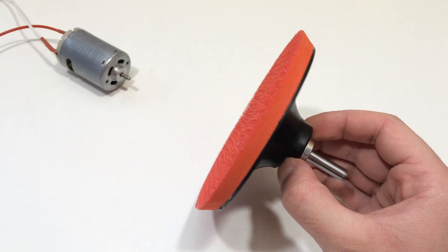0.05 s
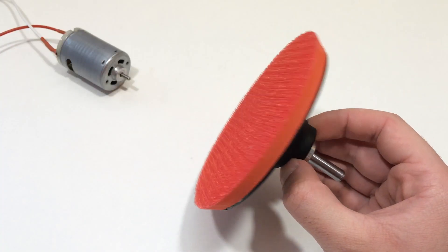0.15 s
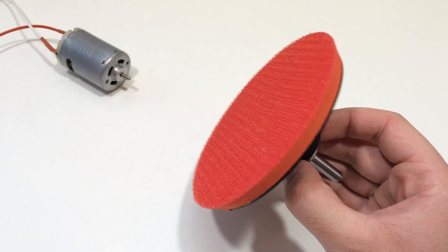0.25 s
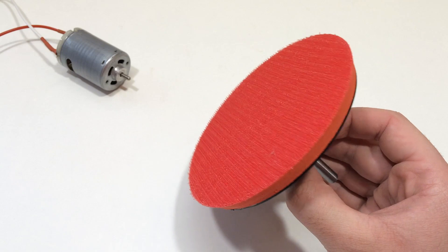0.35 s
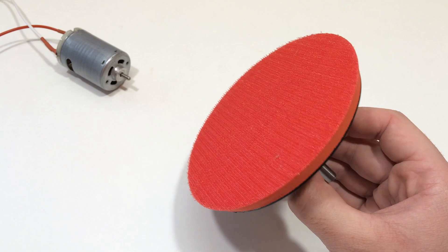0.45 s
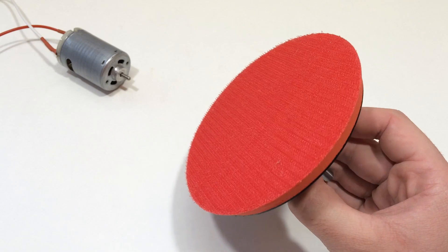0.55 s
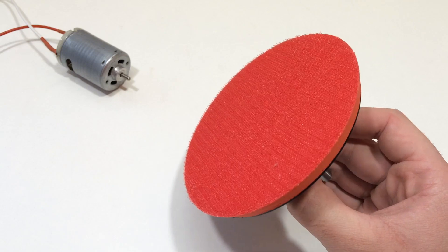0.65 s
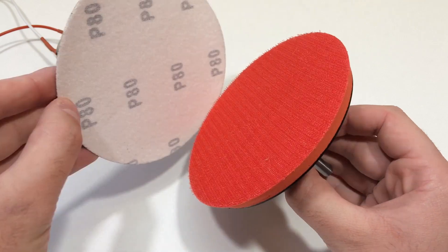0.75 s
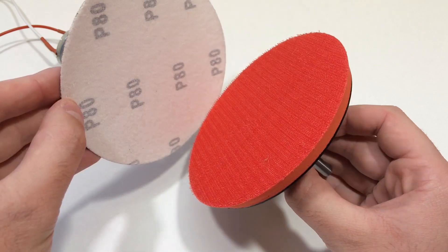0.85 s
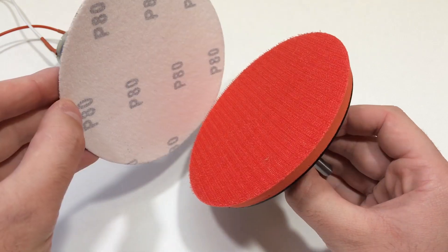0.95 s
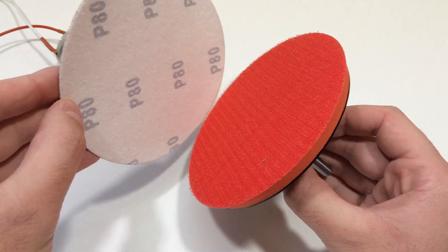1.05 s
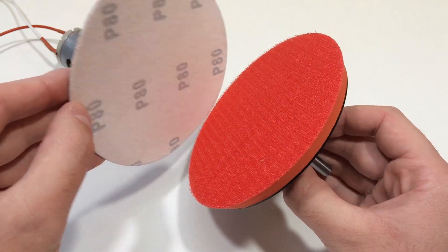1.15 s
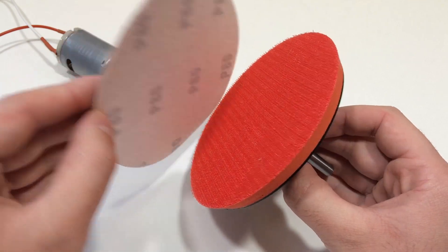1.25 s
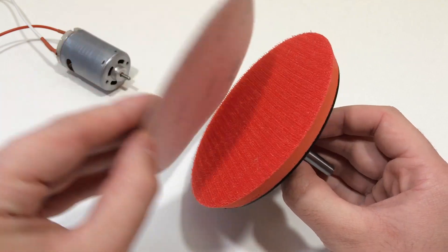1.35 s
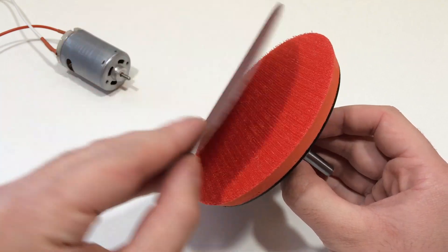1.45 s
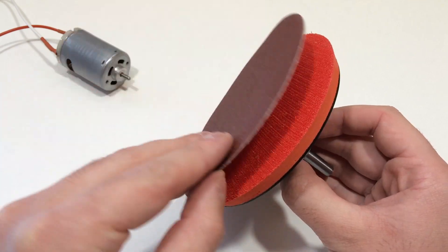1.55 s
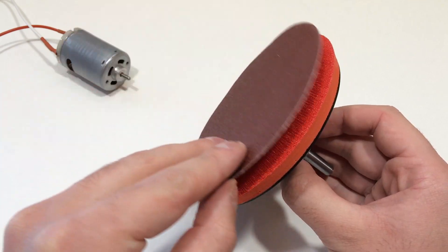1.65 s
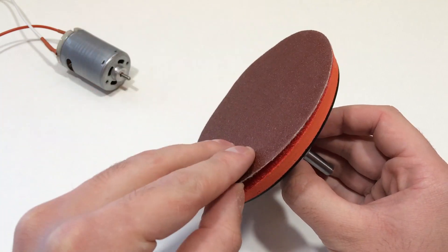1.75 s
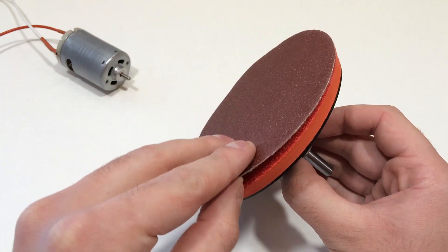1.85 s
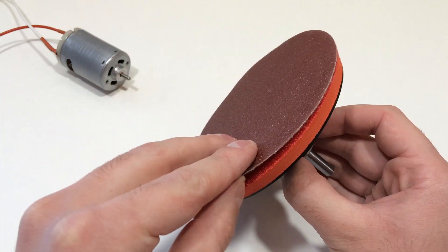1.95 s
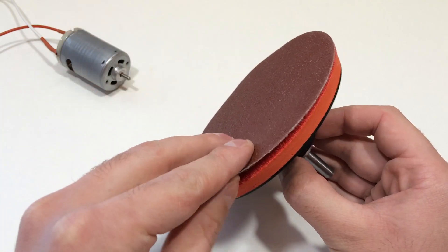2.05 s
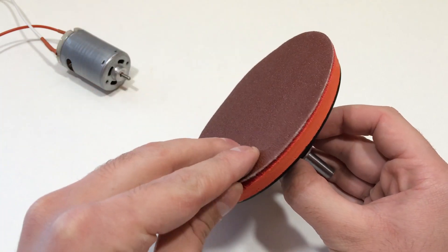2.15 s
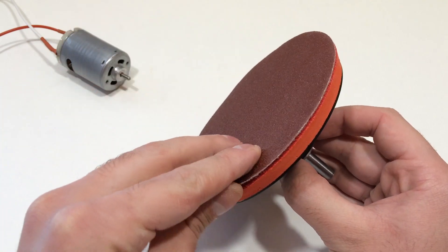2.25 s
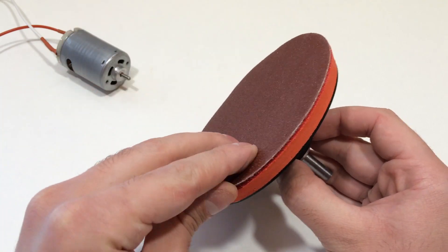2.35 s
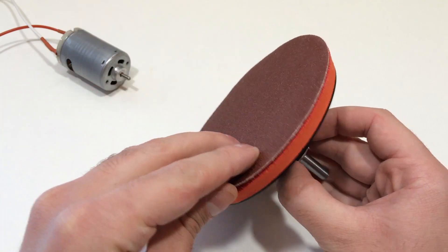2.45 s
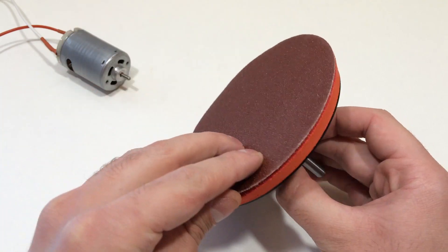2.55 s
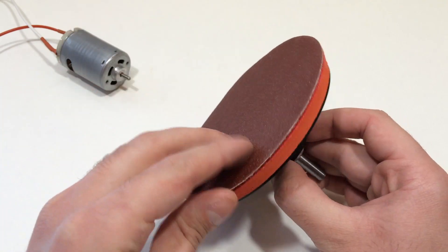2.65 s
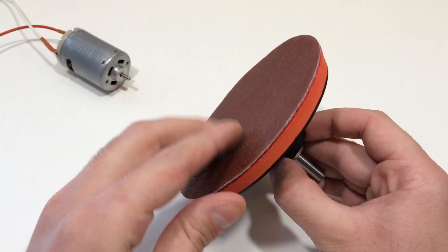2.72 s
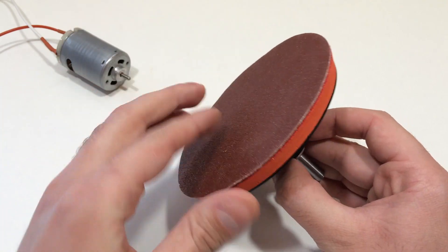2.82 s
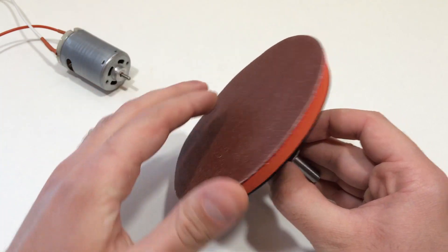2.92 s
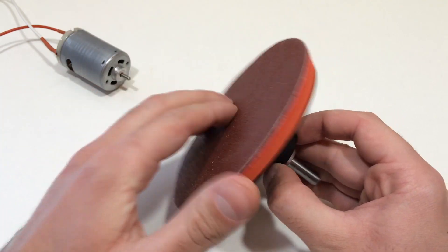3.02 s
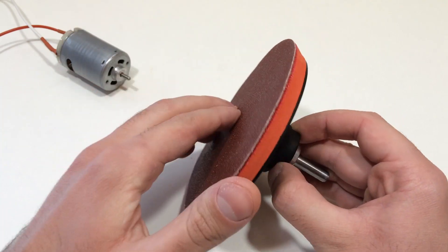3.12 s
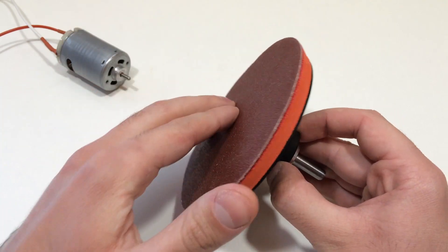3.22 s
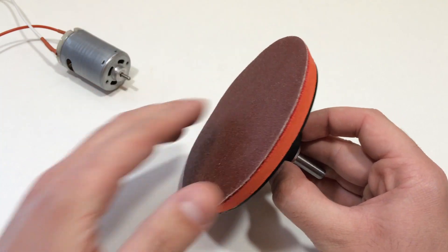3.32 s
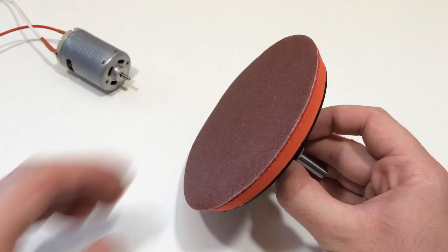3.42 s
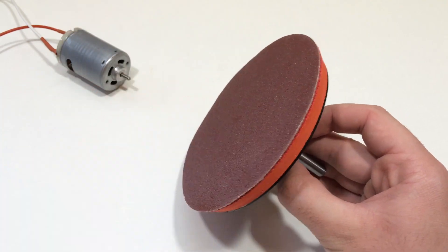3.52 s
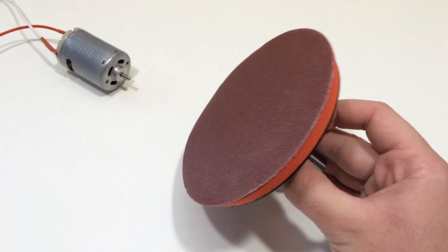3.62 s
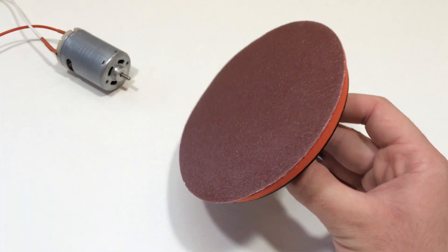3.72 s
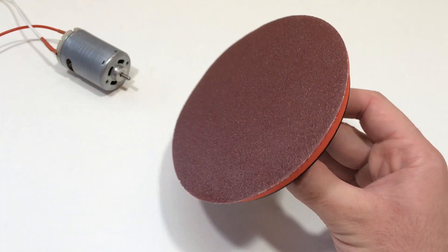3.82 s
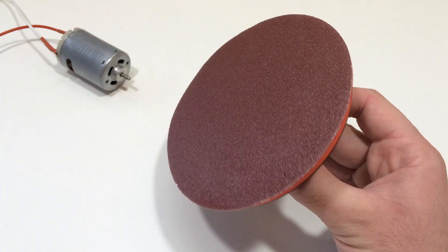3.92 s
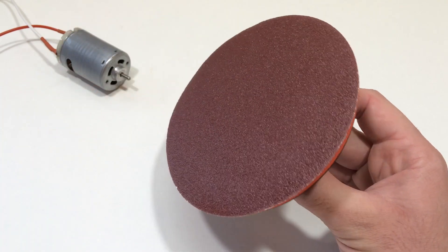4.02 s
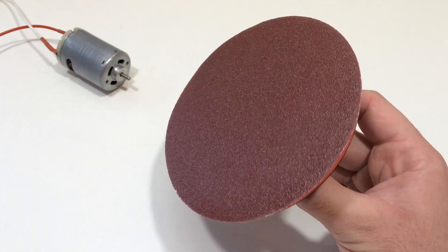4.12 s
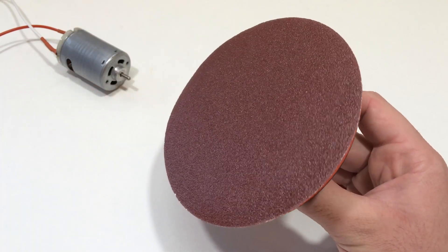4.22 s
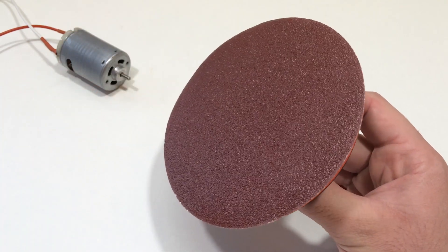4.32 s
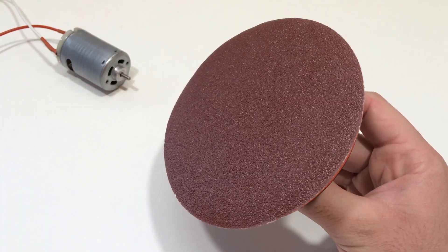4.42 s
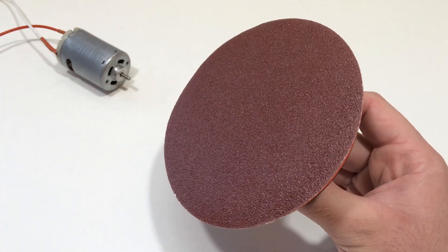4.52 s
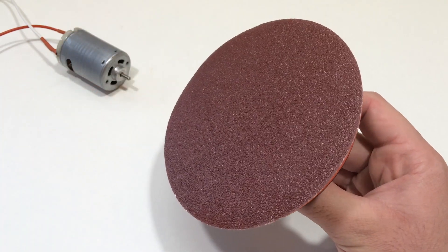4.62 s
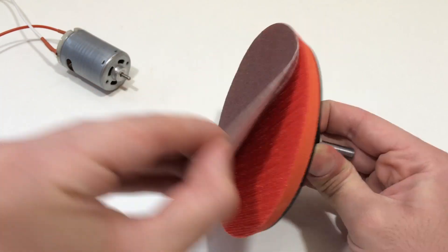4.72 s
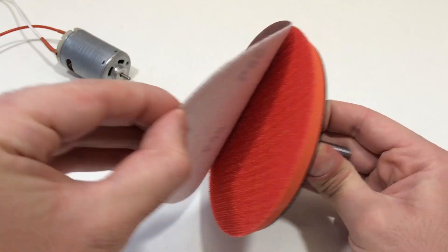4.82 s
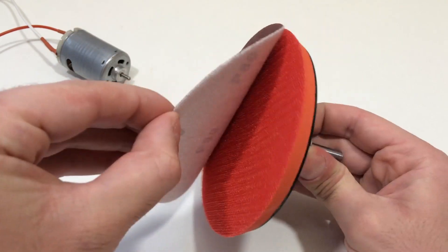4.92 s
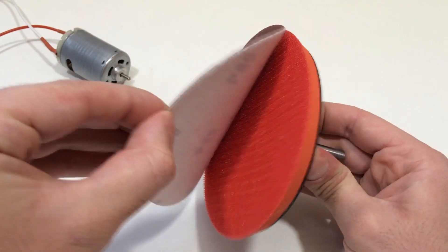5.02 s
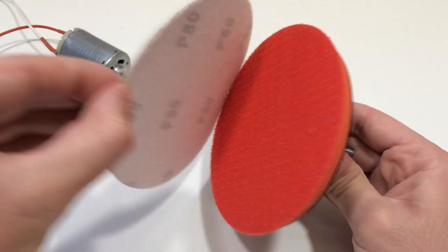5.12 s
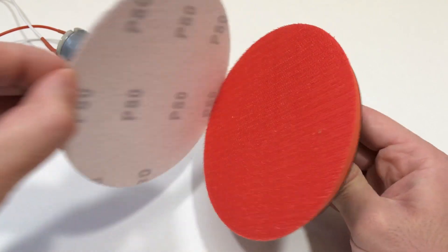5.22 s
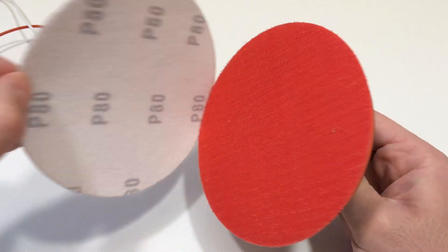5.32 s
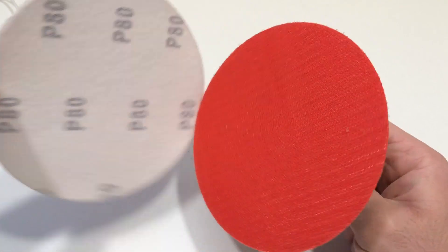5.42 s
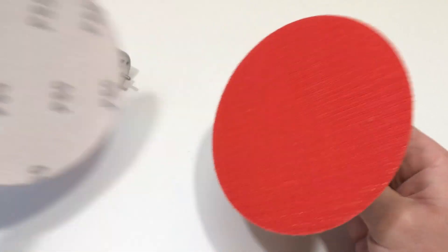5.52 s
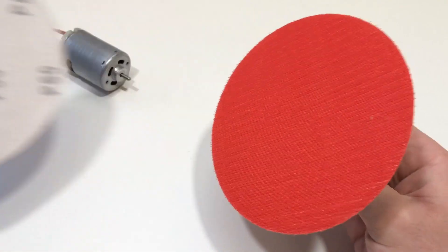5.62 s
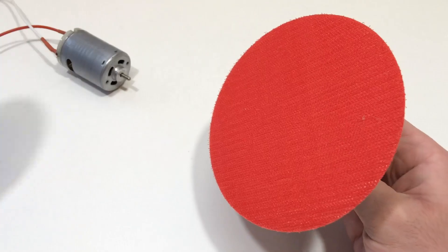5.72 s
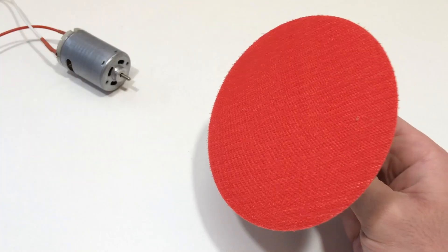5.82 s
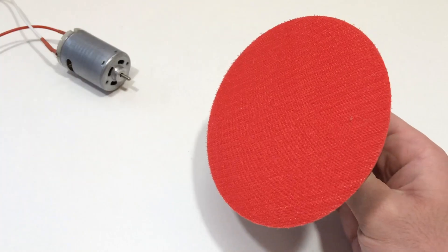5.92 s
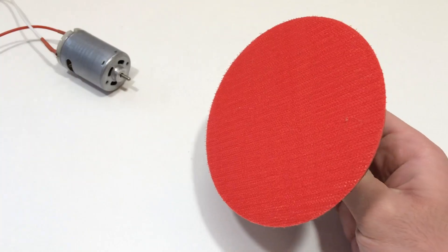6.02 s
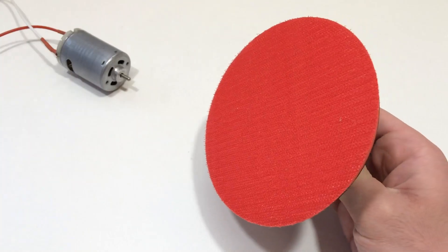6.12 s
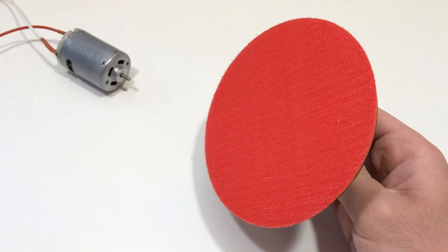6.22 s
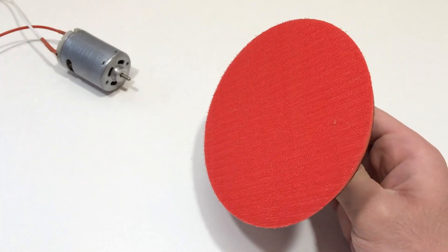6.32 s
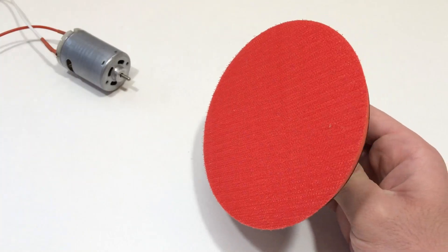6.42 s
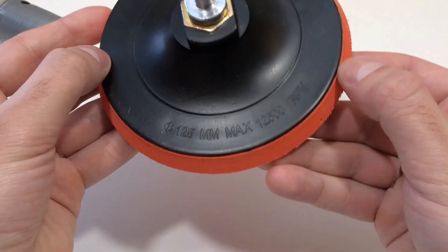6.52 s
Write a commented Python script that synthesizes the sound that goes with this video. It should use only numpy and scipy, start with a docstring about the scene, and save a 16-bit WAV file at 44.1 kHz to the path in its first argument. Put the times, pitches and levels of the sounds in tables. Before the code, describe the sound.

A fabric-backed sanding disc is lightly handled, then torn sharply from a hook-and-loop pad, two harsh bursts and a trailing crackle, close and dry.

```python
"""Steady hiss comes first, then a lumpy low rumble with light ticks and scrapes of handling.
A sanding disc is pressed on to a hand-held hook-and-loop pad, then ripped off in a few quick, uneven pulls.
The hooks let go in clusters of tiny snaps, filtered noise bursts that ring the paper and tug the pad.
Weak loops crackle, the paper drums, and the freed flap flops once, as a few fading sine waves.
Short echoes and a noise tail place all this close above a table in a small room."""
import sys
import numpy as np
from scipy import signal
from scipy.fft import rfft, irfft
from scipy.io import wavfile
from scipy.ndimage import uniform_filter1d

SR = 44100
rng = np.random.default_rng(int(sys.argv[2]) if len(sys.argv) > 2 else 0)


def to_wav(sig):
    """Store sig (one row per channel, or 1-D mono) as 16-bit WAV at the path in sys.argv[1].

    Samples outside -1..1 are clipped; the rate is SR.
    """
    pcm = np.clip(np.atleast_2d(sig), -1, 1) * 32767
    pcm = np.round(pcm).astype(np.int16)
    wavfile.write(sys.argv[1], SR, pcm.T)  # frames by channels


N = 289456
TIME = np.arange(N) / SR
SIZE = 2048  # samples in one snap
BINS = np.fft.rfftfreq(SIZE, 1 / SR)
SIDES = np.array([[1], [-1]])  # opposite signs in the left and right channels

# the paper's main resonance and tone as it bends and comes free; snap() scales the brightness:
# start_s [s], pitch_hz [Hz], lift_db [dB], brightness [dB before scaling]
FLAP_CURVE = [(1.4, 1620, 2, 0), (4.7, 1750, 2.5, 7.5), (4.81, 1690, 3, 1.5), (4.87, 2140, 8, -0.5),
              (5.07, 1740, 7, -2), (5.2, 1800, 5, 1.5), (5.28, 1830, 7.5, 8.5), (5.4, 1510, 6, -2),
              (5.55, 1340, 15, 6.5)]
# tone of one hook's snap: pitch_hz [Hz], relative level_db [dB]
SNAP_TONE = [(40, -38), (250, -23.5), (800, -9.5), (1200, -6), (1700, 0.5), (2400, -1.5), (3200, 2),
             (4200, 0), (6000, 3.5), (7500, 0), (10000, -5.5), (13000, -9), (16000, -21)]
# tone of the foam pad when a hook tugs it: pitch_hz [Hz], relative level_db [dB]
PAD_TONE = [(30, -28), (80, -5), (200, -1), (330, 1), (430, -7.5), (550, 1.5), (800, -8.5), (1500, -17),
            (4000, -82)]
# stretches in which the peeling line advances, and the pitch that the flap's drumming sinks towards:
# start_s [s], length_s [s], crackle level_db [dB], low_hz [Hz]
PULL_TIMES = [(4.689, 0.056, -49, 303), (4.769, 0.124, -31.5, 185.6), (5.125, 0.093, -32, 315.3),
              (5.262, 0.048, -37.5, 294.5), (5.353, .011, -33, 320), (5.51, 0.038, -32, 300)]


def gain_of(db):
    """Turns decibels into amplitude."""
    return 10 ** (np.asarray(db) / 20)


def evened(x):
    """Scales a sound to rms 1."""
    return x / np.sqrt(np.mean(x ** 2) + 1e-20)


def read(points, hz):
    """Reads a table between its points, along a log-frequency axis."""
    f, value = np.transpose(points)
    return np.interp(np.log(hz + 1), np.log(f + 1), value)


def follow(curve, s, axis=1):
    """Reads one column of a curve at the times s."""
    columns = np.transpose(curve)
    return np.interp(s, columns[0], columns[axis])


def add(mix, s, sound):
    """Mixes a sound in at time s."""
    part = mix[round(s * SR):][:len(sound)]
    part += sound[:len(part)]


def ring(db):
    """Makes the sharp-fronted (minimum-phase) response that has this spectrum, with energy 1."""
    log_gain = np.log(gain_of(np.r_[db, db[-2:0:-1]]))
    response = np.fft.ifft(np.exp(np.conj(signal.hilbert(log_gain)))).real
    return response / np.linalg.norm(response)


def noise(spectrum):
    """Makes steady noise of rms 1 with this spectrum."""
    colour = gain_of(read(spectrum, np.fft.rfftfreq(N, 1 / SR)))
    return evened(irfft(rfft(rng.standard_normal(N)) * colour, N))


def burst(sound, db):
    """Gives a short sound the energy of 1 ms of sound with rms level db."""
    return gain_of(db) * sound * np.sqrt(SR / 1000) / np.linalg.norm(sound)


def hiss(level_db=-60.5):
    """Microphone hiss: steady random noise, separate in the two channels."""
    # tone of the hiss: pitch_hz [Hz], relative level_db [dB]
    hiss_tone = [(18, -36), (30, -2.5), (467, -3.5), (709, -3.5), (921, -2.5), (1020, -4.5), (1820, -5),
                 (15500, -7.5)]
    return gain_of(level_db) * np.array([noise(hiss_tone), noise(hiss_tone)])


def rumble_strength(from_s=0.714, to_s=5.76, level_db=-57.5, entry_db=-7, swell_s=0.64, fade_db_per_s=17):
    """Strength of the low rumble: it sets in quickly, swells, holds and dies away."""
    swell_db = entry_db * np.clip(1 - (TIME - from_s) / swell_s, 0, 1)
    fade_db = fade_db_per_s * np.maximum(TIME - to_s, 0)
    entry = np.clip((TIME - from_s) / 0.01, 0, 1)
    return gain_of(level_db + swell_db - fade_db) * entry


def rumble(lumps_db=1.5, side_db=-27):
    """Lumpy, near-mono low noise: slow random swells in strength, coloured by a few resonances."""
    # tone beneath the resonances: pitch_hz [Hz], relative level_db [dB]
    rumble_tone = [(20, -14.5), (35, -20), (58, -5.5), (80, -5), (120, -8.5), (190, -27.5), (320, -11.5),
                   (420, -20), (650, -23.5), (1000, -20.5), (1600, -29), (4000, -39), (16000, -54)]
    # resonances: pitch_hz [Hz], spread_hz to either side [Hz], relative level_db [dB]
    resonances = [(61, 14.7, 7.5), (107, 22.4, 2), (134.6, 22.4, 3), (171.7, 9.7, 5), (208.7, 8.6, 0),
                  (236, 28, -6), (292, 35, -9), (317, 20.4, -4.5)]
    hz = np.fft.rfftfreq(N, 1 / SR)
    booms = sum(gain_of(db) ** 2 / (1 + ((hz - f) / spread) ** 2) ** 3 for f, spread, db in resonances)
    colour = np.sqrt(gain_of(read(rumble_tone, hz)) ** 2 + booms)
    lumps = gain_of(lumps_db * noise([(1, 7.0), (14, -6), (40, -65), (80, -120)]))
    mid, side = (evened(irfft(rfft(lumps * rng.standard_normal(N)) * colour, N)) for _ in range(2))
    return rumble_strength() * (mid + SIDES * gain_of(side_db) * side)


def snap(spectrum, s, bright_db, flap_octaves=0.69, pivot_hz=3800, tilt_share=0.39, uneven_db=2.1,
         scatter_db=-4, scatter_t60=0.0085):
    """One snap through the paper; each spot colours it, and bending waves scatter back from the rim."""
    octave = np.log2(BINS + 1)
    octaves_off = octave - np.log2(follow(FLAP_CURVE, s))
    flap_db = follow(FLAP_CURVE, s, axis=2) * np.exp(-(octaves_off / flap_octaves) ** 2)
    tilt_db = tilt_share * bright_db * np.tanh(2 * (octave - np.log2(pivot_hz)))
    # random unevenness of tone, smoothed along the spectrum
    spot = uniform_filter1d(rng.standard_normal(len(BINS)), size=24)
    spot = evened(uniform_filter1d(spot, size=24))
    t = TIME[:SIZE]
    waves = rng.standard_normal(SIZE) * gain_of(-60 * t / scatter_t60) * (1 - np.exp(-t / 0.00025))
    paper = signal.unit_impulse(SIZE) + gain_of(scatter_db) * waves / np.linalg.norm(waves)
    direct = ring(read(spectrum, BINS) + flap_db + tilt_db + uneven_db * spot)
    return signal.fftconvolve(direct, paper)[:SIZE]


def ticks(touch_s=1.7, press_from_s=1.9, press_to_s=2.31, count=14):
    """Bare paper ticks, then single hooks catch as the disc is fitted and pressed home."""
    # the clearest ticks; snap() scales the brightness:
    # start_s [s], level_db [dB, rms over 1 ms], brightness [dB before scaling]
    clear_ticks = [(1.0542, -50, -3), (1.0752, -47, 2), (1.2655, -38.5, -5.5), (1.3354, -47.5, -5),
                   (1.4348, -24, 2), (1.4413, -38, -11), (1.4952, -48, -3), (1.5382, -36.5, -6),
                   (1.5486, -44, -7), (1.655, -52, -8), (1.7366, -36.5, 8.5), (1.7456, -42, 7),
                   (2.0558, -49, 3), (2.1605, -45.5, 0), (2.3609, -40, 13), (2.378, -45.5, 16),
                   (2.5829, -44, 31), (2.7415, -48, 6), (2.7636, -50, 6), (2.8243, -45.5, 2),
                   (3.3854, -43.5, 31), (4.416, -43.5, -2.5)]
    # tone of a tick on the flat, unbent disc: pitch_hz [Hz], relative level_db [dB]
    tap_tone = [(300, -32), (800, -10.5), (1100, -15.5), (1450, -0.5), (2400, -7), (3200, -1), (4200, -5.5),
                (5800, 4.5), (7000, -1), (10000, -11.5), (13000, -20), (16000, -17)]
    catch_db, catch_spread_db, catch_bright_db = -56.5, 2, 5
    # one faint catch at a random moment in each equal slice of the pressing
    slices = (np.arange(count) + rng.random(count)) / count
    moments = press_from_s + (press_to_s - press_from_s) * slices
    catches = [(s, catch_db + catch_spread_db * rng.standard_normal(), catch_bright_db) for s in moments]
    out = np.zeros(N)
    for s, db, bright_db in list(clear_ticks) + catches:
        spectrum = tap_tone if s < touch_s else SNAP_TONE  # from touch_s the disc lies on the pad
        add(out, s, burst(snap(spectrum, s, bright_db), db))
    return out


def scrapes(grit_db=4.5):
    """Fingertips drag over grains of grit: noise of uneven strength through a resonance."""
    # start_s [s], length_s [s], level_db [dB rms], pitch_hz [Hz],
    # width_hz [Hz, half the bandwidth of each of the two filter passes]
    slides = [(1.011, 0.088, -67.5, 4970, 3920), (2.182, 0.11, -66.5, 6000, 7000),
              (2.716, 0.12, -62.5, 4470, 2400), (2.769, 0.0073, -47, 4270, 1790),
              (2.806, 0.045, -64, 2180, 250), (3.088, 0.04, -62, 2200, 600),
              (3.325, 0.042, -63.5, 2700, 1800)]
    out = np.zeros(N)
    grit = rng.standard_normal(N) * gain_of(grit_db * rng.exponential(1, N))
    for s, length, db, hz, width in slides:
        grains = grit[round(s * SR):][:int(length * SR)]
        band = signal.iirpeak(hz, hz / (2 * width), SR)
        body = signal.lfilter(*band, signal.lfilter(*band, grains))
        add(out, s, gain_of(db) * evened(body * signal.windows.tukey(len(body), 0.7)))
    return out


def bump():
    """A soft bump as the hand shifts on the disc: one low sine wave that dies away."""
    # start_s [s], pitch_hz [Hz], starting level_db [dB], t60_s to fall 60 dB [s]
    hand_bump = (2.5, 58, -46, 0.9)
    s, hz, db, t60 = hand_bump
    since = np.maximum(TIME - s, 0)
    return gain_of(db - 60 * since / t60) * np.sin(2 * np.pi * hz * since)


def hum(top_s=5.51, top_db=-60, width_s=0.72):
    """A faint low hum of steady sine waves that swells and fades, 10 dB down width_s from its top."""
    # pitch_hz [Hz], relative level_db [dB]
    hum_lines = [(95, 0.5), (284, -8)]
    tones = sum(gain_of(db) * np.sin(2 * np.pi * (f * TIME + rng.random())) for f, db in hum_lines)
    return tones * gain_of(top_db - 10 * ((TIME - top_s) / width_s) ** 2)


def pull(start, length, rise_s=0.0069, stop_s=0.0035):
    """Pace of one pull, 0 to 1: it takes hold, keeps its pace, then stalls."""
    since = TIME - start
    return np.clip(since / rise_s, 0, 1) * np.exp(-np.clip((since - length) / stop_s, 0, 20))


def peeling():
    """Strength of the peel: it sets the crackle's amplitude and the size of the avalanches."""
    return sum(gain_of(db) * pull(start, length) for start, length, db, _ in PULL_TIMES)


def crackle(fibres_per_s=1700, scatter_db=5.5, bright_db=1, pad_db=-14):
    """Weak loops slip off all along the peeling line, at random moments and in random sizes."""
    force = gain_of(scatter_db * np.minimum(rng.exponential(1, N), 3)) * rng.choice([-1, 1], N)
    slips = evened(force * (rng.random(N) < fibres_per_s / SR)) * peeling()
    out, pad = np.zeros(N), gain_of(pad_db) * ring(read(PAD_TONE, BINS))
    step = 256  # samples that share one snap sound
    for i in range(int(4.6 * SR), int(5.6 * SR), step):
        sound = snap(SNAP_TONE, i / SR, follow(FLAP_CURVE, i / SR, axis=3) + bright_db)
        add(out, i / SR, signal.fftconvolve(slips[i:i + step], sound + pad))
    return out


def drum(width_hz=80, drum_db=-15.5, start_hz=900, sink_s=0.018):
    """Random jolts in the taut flap's resonance, which sinks in each pull as the flap grows longer."""
    jolts = rng.standard_normal(N) + 1j * rng.standard_normal(N)
    smooth = signal.sosfilt(signal.butter(2, width_hz / 2, fs=SR, output="sos"), jolts)
    out = np.zeros(N)
    for start, length, db, low_hz in PULL_TIMES:
        hz = low_hz + (start_hz - low_hz) * np.exp(-np.maximum(TIME - start, 0) / sink_s)
        # carry the slow jolts up to the sinking pitch
        tone = evened((smooth * np.exp(2j * np.pi * np.cumsum(hz) / SR)).real)
        out += gain_of(db + drum_db) * pull(start, length) * tone  # drum_db: relative to crackle level
    return out


def rips(hooks_per_s=2150, growth=1.0, colour_db=4.0, pad_db=-22, count=12):
    """A hook that gives way overloads its neighbours: longer avalanches in strong rips and fast pulls."""
    # the loudest clusters of hooks letting go: start_s [s], level_db [dB, rms over 1 ms]
    clusters = [(4.717, -29.5), (4.7408, -28.5), (4.7686, -24.5), (4.7822, -20.5), (4.7863, -17.5),
                (4.81, -15), (4.8191, -15), (4.8275, -15.5), (4.837, -18), (4.8508, -12.5), (4.872, -17),
                (4.877, -10.5), (4.8853, -15), (4.8906, -20), (4.94, -28.5), (5.0669, -30), (5.1056, -27),
                (5.1312, -16.5), (5.1398, -10), (5.148, -15.5), (5.153, -18.5), (5.1667, -19),
                (5.1738, -22), (5.181, -12.5), (5.193, -12), (5.2015, -8.5), (5.2116, -15.5),
                (5.2625, -19.5), (5.267, -17), (5.278, -24), (5.283, -20), (5.2868, -18), (5.2985, -18),
                (5.3115, -20.5), (5.326, -24.5), (5.354, -27), (5.3603, -21.5), (5.3938, -35),
                (5.4033, -28), (5.4103, -32), (5.4212, -30), (5.4362, -26), (5.453, -32.5), (5.4693, -32.5),
                (5.4893, -22.5), (5.5161, -25), (5.526, -17.5), (5.5469, -24), (5.551, -16.5)]
    # hooks in a lone snap, and extra hooks in a cluster of level big_db at peel strength fast_db
    lone_hooks, extra_hooks, big_db, fast_db = 1.62, 9.56, -10.5, -29.5
    out, pad = np.zeros(N), gain_of(pad_db) * ring(read(PAD_TONE, BINS))
    pace, order = peeling() / gain_of(fast_db), np.arange(count)
    for s, db in clusters:
        hooks = lone_hooks + extra_hooks * pace[round(s * SR)] * gain_of(db - big_db) ** growth
        delays = (order + rng.random(count) * (order > 0)) / hooks_per_s
        # hooks beyond the avalanche's size stay silent
        forces = rng.uniform(0.43, 1, count) * np.clip(hooks - order, 0, 1)
        bright_db = follow(FLAP_CURVE, s, axis=3) + colour_db * rng.standard_normal()
        cluster = np.zeros(2 * SIZE)
        for delay, force, sign in zip(delays, forces, rng.choice([-1, 1], count)):
            # every hook tugs the pad the same way, so large clusters thump more
            add(cluster, delay, force * (sign * snap(SNAP_TONE, s, bright_db) + pad))
        add(out, s, burst(cluster, db))
    return out


def flop(start_s=5.3638, rise_s=0.0013, tense=1.035, slack=0.935, relax_s=0.011):
    """The bent flap springs over; its low modes sag in pitch as the tension goes."""
    # pitch_hz before the tension factor [Hz], level_db before the soft onset [dB], t60_s to fall 60 dB [s]
    flap_modes = [(227, -31.5, 0.059), (303, -26, 0.044), (394, -27, 0.049), (517, -17, 0.035),
                  (935, -31, 0.032), (997, -22.5, 0.035), (1410, -27, 0.019)]
    t, out = np.arange(SR // 8) / SR, np.zeros(N)
    # pitch factor glides from tense to slack
    clock = np.cumsum(slack + (tense - slack) * np.exp(-t / relax_s)) / SR
    modes = sum(gain_of(db - 60 * t / t60) * np.sin(2 * np.pi * hz * clock) for hz, db, t60 in flap_modes)
    add(out, start_s, modes * (1 - np.exp(-t / rise_s)))
    return out


def room(x, wet_db=-12, first_s=0.006, side_db=-24):
    """Echoes off the table and near things, then a short tail that differs a little between channels."""
    # near surfaces: delay_s [s], gain [amplitude ratio]
    near_echoes = [(.0029, 0.13), (.007, 0.071)]
    # how long the tail lasts: pitch_hz [Hz], t60_s to fall 60 dB [s]
    tail_times = [(200, 0.14), (1500, 0.19), (6000, 0.14), (15000, 0.18)]
    near = x.copy()
    for delay, gain in near_echoes:
        add(near, delay, gain * x)
    count = SR // 3
    taps = rng.standard_normal((2, count)) * (rng.random((2, count)) < 0.15)
    taps = taps * (np.arange(count) > first_s * SR)
    # each pitch band of the tail dies away at its own pace
    hz, t, z = signal.stft(taps, SR, nperseg=256)
    tails = signal.istft(z * gain_of(-60 * t / read(tail_times, hz)[:, None]), SR, nperseg=256)[1]
    tails = tails / np.linalg.norm(tails[0])
    mid, side = gain_of(wet_db) * signal.fftconvolve(x[None], tails, axes=1)[:, :N]
    return near + mid + SIDES * gain_of(side_db) * side


def scene():
    """Disc and pad in the room, over the background sounds."""
    background = hiss() + rumble() + bump() + hum()
    disc = ticks() + scrapes() + crackle() + drum() + rips() + flop()
    return room(disc) + background


def record(dry, ceiling=0.55, edge_hz=15900):
    """Rounds off the sharpest peaks, then cuts the treble above the recorder's band limit."""
    rounded = ceiling * np.tanh(dry / ceiling)
    low_pass = signal.firwin(511, edge_hz, window=("kaiser", 9), fs=SR)
    return signal.oaconvolve(rounded, low_pass[None], "same")


dry = scene()
out = record(dry)
to_wav(out)
```